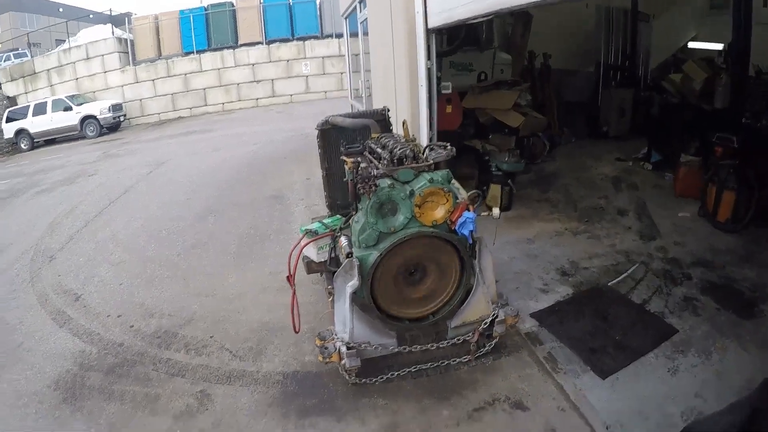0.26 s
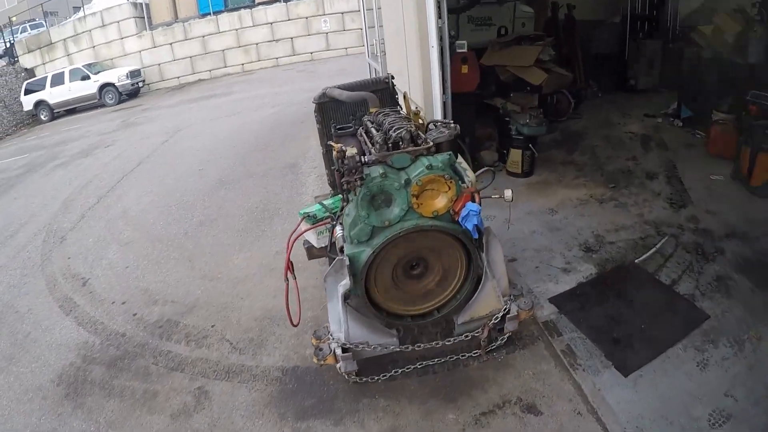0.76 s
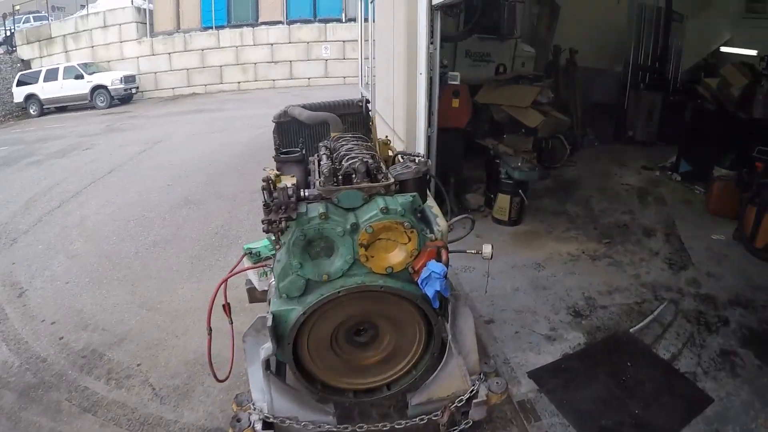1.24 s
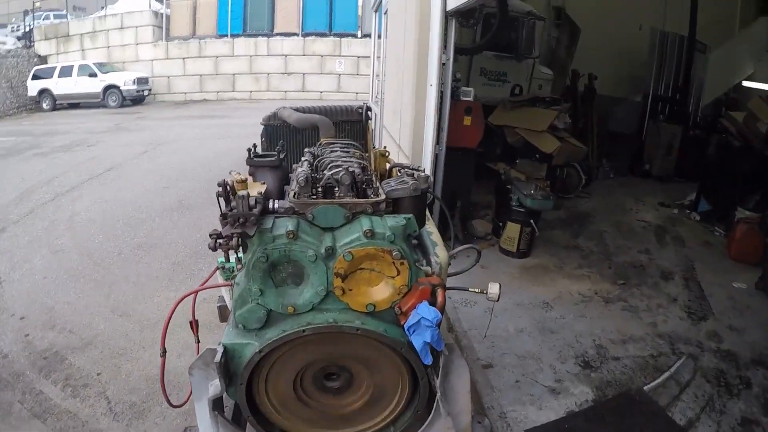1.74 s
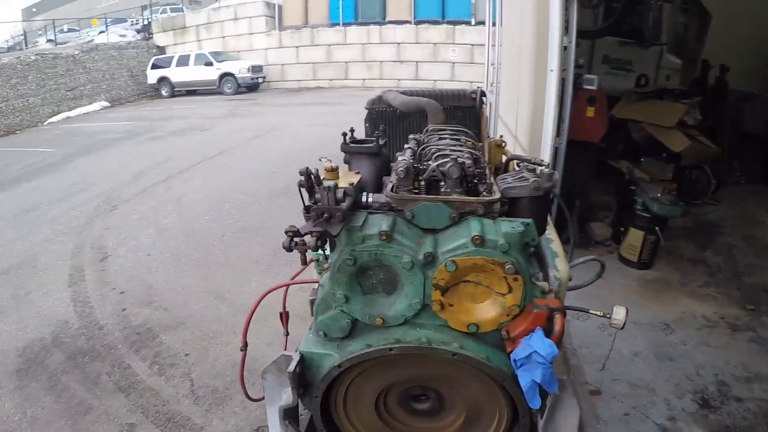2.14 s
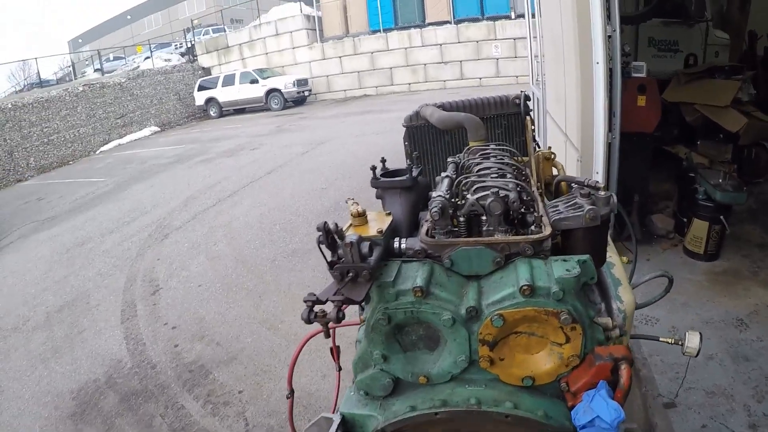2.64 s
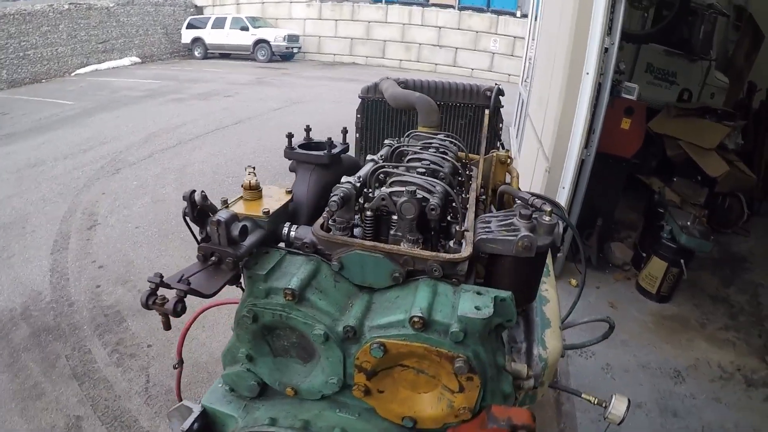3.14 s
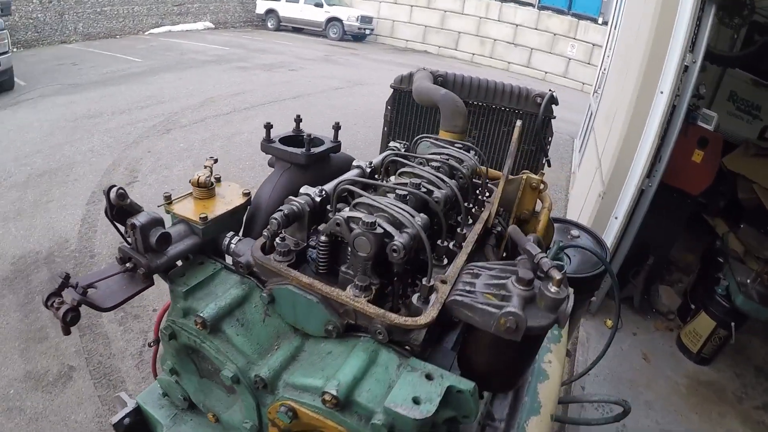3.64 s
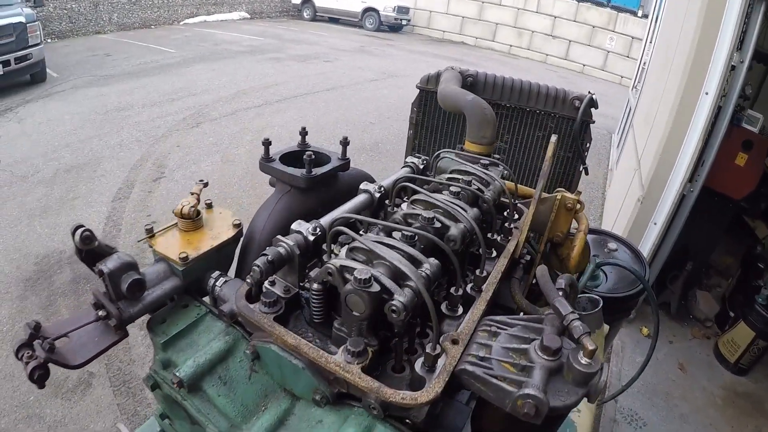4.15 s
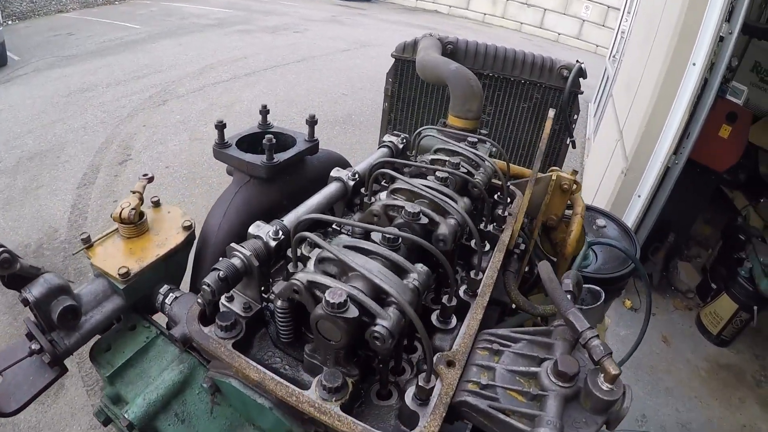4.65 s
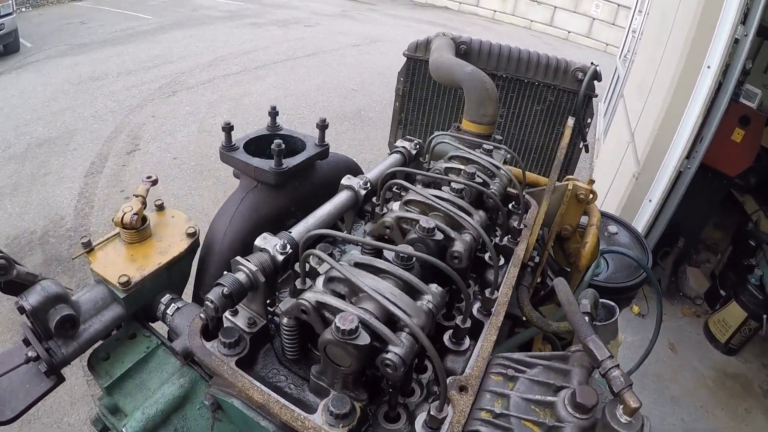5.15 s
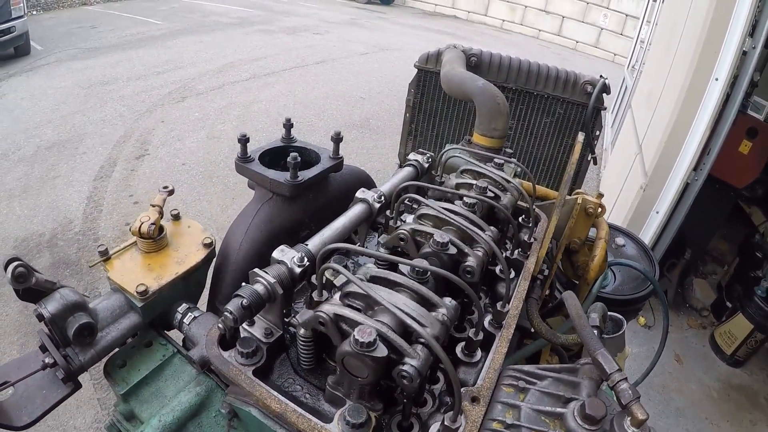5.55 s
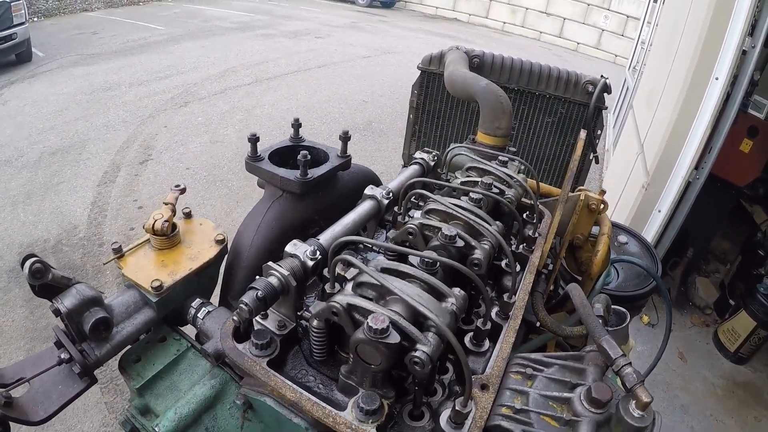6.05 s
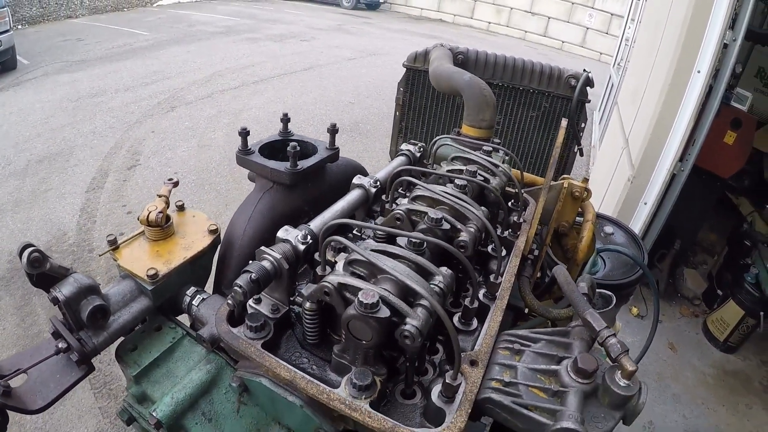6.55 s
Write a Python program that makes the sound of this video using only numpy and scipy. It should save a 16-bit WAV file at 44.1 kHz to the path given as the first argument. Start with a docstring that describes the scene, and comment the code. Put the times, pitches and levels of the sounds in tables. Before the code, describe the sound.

Fast, uneven diesel chugging over blower hiss, the hollow exhaust hum giving way to sharp rocker and valve rattle as one walks up close.

```python
"""A three-cylinder two-stroke diesel idles over the hiss of its blower and fan, both running from the start.
Each firing knocks the iron block (ringing modes), sets off metallic clatter (bursts of noise and thin modes)
and booms in the exhaust (resonances struck by pulses). The governor hunts, so firings run a few ms early or late.
The listener walks up to the bare valve gear, so the balance of the layers changes on the way.
"""
import sys
import numpy as np
from scipy import signal
from scipy.io import wavfile

SR = 44100
rng = np.random.default_rng(int(sys.argv[2]) if len(sys.argv) > 2 else 0)


def unload_audio(sound):
    """Save the sound as a 16-bit wav file, at the path given as the first command line argument."""
    columns = np.transpose(np.atleast_2d(sound))
    # keep every value between -1 and 1, then stretch to whole-number steps
    steps = np.round(np.clip(columns, -1, 1) * 32767)
    wavfile.write(sys.argv[1], SR, steps.astype(np.int16))


N = 299880

# firing rate, and the time of one firing of the first cylinder, before the governor shifts them
FIRING_HZ, CYLINDER_1_S = 30.475, .063
SLAP_MS = 12.3  # from the knock to the rocker slap


def undb(db):
    """Turn a level in dB into a gain."""
    return 10 ** (np.asarray(db) / 20)


def at(table, hz):
    """Read a table of (Hz, value) at any pitch, on a log-frequency axis."""
    table_hz, values = np.array(table)[:, 0], np.array(table)[:, 1]
    return np.interp(np.log(hz), np.log(table_hz), values)


def by_distance(near, levels_db):
    """Blend three levels in dB (far, halfway, near) by the nearness 0-1."""
    return np.interp(near, [0, .5, 1], levels_db)


def ring(x, hz, width):
    """Let x excite a two-pole resonance with gain 1 at its centre; a narrow width rings longer."""
    return signal.lfilter(*signal.iirpeak(hz, hz / width, SR), x)


def fade(x, ms):
    """Give each click a tail that dies away with this time constant, starting at the click's height."""
    return signal.lfilter([1], [1, -np.exp(-1000 / (ms * SR))], x)


def clicks(times, sizes):
    """Put a click at each time, shared between two samples to place it exactly."""
    place = np.clip(times * SR, 0, N)
    first = place.astype(int)
    late_share = place - first
    inside = sizes * (times > 0)
    out = np.zeros(N + 2)
    np.add.at(out, first, inside * (1 - late_share))
    np.add.at(out, first + 1, inside * late_share)
    return out[:N]


# How alike left and right are.
# Each row: frequency in Hz, likeness from 0 (unrelated) to 1 (identical).
LIKENESS = [(35, .3), (100, 0.45), (500, 0.94), (1000, 0), (2000, 0.81), (5000, 1), (7000, 0.56), (9000, 0),
            (14000, 0)]


def pair(hz, octaves):
    """Make a band of noise for left and right, rms 1, sharing a middle part and opposed in a side part."""
    edges = hz * 2 ** (np.array([-octaves, octaves]) / 2)
    edges = np.minimum(edges, .49 * SR)
    band = signal.butter(2, edges, "band", fs=SR, output="sos")
    mid, side = signal.sosfilt(band, rng.standard_normal((2, N)))
    alike = np.clip(at(LIKENESS, hz), 0, 1)
    opposed = np.array([[1], [-1]])
    both = np.sqrt(1 + alike) * mid + np.sqrt(1 - alike) * side * opposed
    return both / both.std()


# How the governor hunts. Each row: time in seconds, how late the firings run in ms (negative is early).
GOVERNOR = [(0, -3), (.4, 2), (.6, 2.8), (1.15, -1.5), (1.5, -1.2), (2.15, 1.9), (2.55, 1.8), (3.2, -1.9),
            (3.6, 1.2), (3.85, 1), (4.4, -6.6), (4.6, -6), (5, -2), (5.4, 4.5), (5.62, 5), (6.05, 1.6),
            (6.8, -.9)]
# The cylinders in firing order; the knock and the exhaust take only part of the lateness.
# Each row: lateness in ms, boom in dB, clatter in dB, rattle of the rocker slap in dB against that clatter.
CYLINDERS = [(0.03, 0, -2, -17), (0.63, 0, -4.5, -12.5), (0.02, -0.5, -2.5, -17.5)]


def firings():
    """Space the firings evenly, then let the governor shift them; also number the cylinder that fires."""
    cylinders = len(CYLINDERS)
    count = np.arange(int(N / SR * FIRING_HZ) + cylinders)
    even = CYLINDER_1_S + (count - cylinders) / FIRING_HZ  # counting starts one round earlier
    late_ms = np.interp(even, *np.transpose(GOVERNOR))
    return even + late_ms / 1000, count % cylinders


# Colour of the blower and fan. Each row: frequency in Hz, level in dB per Hz (only the shape counts).
HISS_COLOUR = [(40, -14), (100, -4), (170, -17.5), (250, -0.5), (400, -10), (600, -11.5), (1000, -11.5),
               (1300, -18), (2000, -20), (4000, -25), (5200, -27.5), (7000, -19.5), (9000, -44.5),
               (15000, -42)]
HISS_DB = -26  # before the walk changes it


def blower():
    """Blower and radiator fan rush steadily: half-octave bands of noise, weighted by their colour."""
    out = 0
    for hz in 40 * 2 ** np.arange(0, 8.7, .5):
        db = at(HISS_COLOUR, hz) + 10 * np.log10(hz)  # a wider band holds more power
        out = out + pair(hz, .5) * undb(db)
    return out * undb(HISS_DB) / out.std()


# Ringing modes of the block and valve gear. Each row: frequency in Hz, width in Hz,
# level in dB when struck by cylinder 1, 2 and 3, change in dB when far, change in dB when near,
# extra level of the slap in dB.
BLOCK_MODES = [(346, 35, -39.5, -28.5, -39.5, -12, -1.5, -4), (399.4, 29, -38, -24, -43, -13.5, -9, 2),
               (439.8, 28, -41.5, -45, -28, 6, -10, 3), (504.3, 77, -33, -36, -28, -18.5, 5.5, -11.5),
               (594, 45, -29.5, -42, -30.5, -10.5, 6.5, -1), (693.6, 33.5, -36.5, -33.5, -40, -8, 8, 4),
               (759, 42, -41.5, -33, -37.5, -8, -6, 1), (952, 21.3, -28, -35, -41, -7.5, 6, -6),
               (1023, 120, -37, -49, -39.5, -5.5, 3, 0), (1257, 20.5, -57, -45, -34, -2.5, -10, 2.5),
               (1630, 100, -46, -48, -40, 0, 1, 3), (1894, 87, -47, -50, -43, -11, -1, -6),
               (2017, 55, -44.5, -47, -48, -5, 7.5, -1), (2636, 30, -39, -67, -49, -4, 4, -13),
               (3094, 29, -39, -40, -44, -6, -32, 6), (3390, 30, -67, -53, -64, 14, -50, -17),
               (4100, 55, -62, -48, -50.5, -4, -4, 3)]
# Force of the slap on the block against the knock. One value for each cylinder, in dB.
SLAP_FORCE = np.array([-14, -12, -3])
# Stereo lean of the knock and clatter. Each row: frequency in Hz, left minus right in dB.
LEFT_RIGHT = [(400, 4), (700, -2), (1300, -0.5), (2400, 3), (5000, -2.5), (7200, 2), (9000, -10),
              (14000, -3.5)]
KNOCK_LEAD_MS = 1.982  # the knock comes before the firing time


def knock(times, which, near):
    """The pressure jump, then a rocker slap, strike the block; each cylinder reaches the modes differently."""
    late_ms = np.array(CYLINDERS)[which, 0]
    slap_db = np.array(SLAP_FORCE)[which]
    chance = rng.standard_normal((len(times), len(BLOCK_MODES), 4)).T
    out = 0
    for k, (hz, width, *reach_db, far_db, near_db, mode_slap_db) in enumerate(BLOCK_MODES):
        size = SR / (2 * FIRING_HZ) * undb(np.array(reach_db)[which])
        when = times + (.5 * late_ms - KNOCK_LEAD_MS + 0.085 * chance[0, k]) / 1000
        slap_when = when + (SLAP_MS + .15 * chance[1, k]) / 1000
        knock_size = size * undb(1.23 * chance[2, k])
        slap_size = size * undb(slap_db + mode_slap_db + 2.0 * chance[3, k])
        blows = clicks(when, knock_size) + clicks(slap_when, slap_size)
        # a broad resonance first stands for the length of the contact
        softened = ring(blows, hz, hz / 2)
        struck = ring(softened, hz, width) * undb(by_distance(near, [far_db, 0, near_db]))
        # left and right hear each mode from its own side, up to 3 samples apart
        lean = at(LEFT_RIGHT, hz) / 2
        left = struck * undb(lean)
        right = np.roll(struck, rng.integers(-3, 4)) * undb(-lean)
        out = out + np.array([left, right])
    return out


# Colour of the clatter from afar. Each row: frequency in Hz, level in dB per Hz (only the shape counts).
COLOUR_FAR = [(710, -33), (1200, -4.5), (1610, -4), (2240, -7.5), (3030, -6.5), (4100, -1), (5030, -16.5),
              (6870, 2.5), (12400, -15.5), (14800, -13), (15800, -36)]
# Colour of the clatter close up. Each row: frequency in Hz, level in dB per Hz.
COLOUR_NEAR = [(710, -44), (1200, -19.5), (1590, -6), (1750, -12), (2610, -9.5), (2930, -8), (5310, -8),
               (7170, 2.5), (8620, -16), (10500, -15.5), (15800, -37)]
# How long a burst lasts. Each row: frequency in Hz, time in ms for its tail to fall by 60 dB.
CLATTER_TAIL = [(2000, 63), (7000, 37.2), (14000, 39)]
CLATTER_DB = -26  # before the walk changes it


def clatter(times, which, near, rise_ms=1.78, scatter_db=0.45, colour_db=2.5, grit_db=2.0,
            ring_db=0.0, sharpness=71.0, blow_ms=2.4):
    """Injector, valves and piston rattle in a burst at each firing and at the slap, each with its own colour."""
    late_ms, _, cylinder_db, slap_db = np.array(CYLINDERS)[which].T
    chance = rng.standard_normal((len(times), 3)).T
    when = times + (late_ms - 1.0 + 0.23 * chance[0]) / 1000
    slap_when = when + (SLAP_MS - 1.5 + 1.2 * chance[1]) / 1000
    # single impacts make it gritty: a new random level every 40 samples
    steps = np.repeat(rng.standard_normal(N // 40 + 1), 40)[:N]
    grit = undb(grit_db * steps)
    out = 0
    for hz in 1300 * 2 ** np.arange(0, 3.6, .2):
        own_colour = colour_db * rng.standard_normal((len(times), 2)).T
        firing_db, at_slap_db = own_colour + cylinder_db + scatter_db * chance[2]
        hits = clicks(when, undb(firing_db)) + clicks(slap_when, undb(slap_db + at_slap_db))
        tail_ms = at(CLATTER_TAIL, hz) / np.log(1000)  # 60 dB is a factor of 1000
        burst = fade(fade(hits, tail_ms), rise_ms) * grit
        noise = pair(hz, 0.23)
        # springs, rockers and covers add many thin modes, rung by the first few ms of the burst
        blow = noise * fade(fade(hits, blow_ms), rise_ms) * grit
        thin_hz = hz * 2 ** rng.uniform(-0.105, 0.112, size=5)
        thin = sum(ring(blow, f, f / sharpness) for f in thin_hz)
        band = noise * burst / burst.std() + undb(ring_db) * thin / thin.std()
        far_db, near_db = at(COLOUR_FAR, hz), at(COLOUR_NEAR, hz)
        db = far_db + near * (near_db - far_db) + 10 * np.log10(hz)
        lean = at(LEFT_RIGHT, hz) / 2
        out = out + band * undb(db + np.array([[lean], [-lean]]))
    return out * undb(CLATTER_DB) / out.std()


# Exhaust resonances that boom. Each row: frequency in Hz, width in Hz, arrival in ms after the firing,
# polarity (1 or -1), level in dB when far, halfway and near.
BOOM_MODES = [(54.3, 6.7, 11.5, -1, -23, -28.5, -32.5), (133.5, 23.8, 0.2, 1, -25, -18, -13),
              (89, 31.5, 7.96, 1, -31, -32.5, -23.5), (169.5, 38, 7.73, 1, -26, -22, -18.5),
              (207, 92, 7.68, 1, -24, -27, -67)]
# Exhaust resonances of the pipe that rings on. Each row: the same columns as the boom.
PIPE_MODES = [(247, 7.5, 7.47, -1, -4, -11.5, -16), (262.7, 12.7, 12.57, 1, -9.5, -21, -19)]
PULSE_HZ = 340  # treble limit of the exhaust pulse


def exhaust(times, which, near, boom_db, pipe_db):
    """Blow-down pulses boom at once and again on their way back along the pipe, which rings on."""
    late_ms, cylinder_db = np.array(CYLINDERS)[which, :2].T
    chance = rng.standard_normal((len(times), 2)).T
    size = SR / (2 * FIRING_HZ) * undb(cylinder_db + 0.13 * chance[0])
    when = times + (0.59 * late_ms + 0.12 * chance[1]) / 1000
    out = 0
    for modes, db in ((BOOM_MODES, boom_db), (PIPE_MODES, pipe_db)):
        for hz, width, ms, sign, *place_db in modes:
            gain = undb(db + by_distance(near, place_db))
            pulses = clicks(when + ms / 1000, size)
            out = out + np.sign(sign) * ring(pulses, hz, width) * gain
    # a puff of gas lasts a ms or two, so it has no treble
    soft = signal.butter(6, PULSE_HZ, fs=SR, output="sos")
    return signal.sosfiltfilt(soft, out)


# The walk up to the engine. Each row: time in seconds, nearness from 0 to 1, level of the pipe ring in dB.
WALK = [(0, 0.14, 1), (.6, 0.21, 2.5), (1.1, .25, -2), (2.1, 0.46, -0.5), (2.7, 0.41, -1), (3.6, 0.76, 0.5),
        (4.6, 0.85, 2), (5.1, 0.84, 5), (6.0, 0.87, 1), (6.8, .9, 2)]
# Level of the exhaust boom on the walk: far in dB, halfway in dB, near in dB.
BOOM_LEVEL = (2, 1.74, -1.26)
# Level of the knock on the walk: far in dB, halfway in dB, near in dB.
KNOCK_LEVEL = (1.5, 0.55, -6.5)
# Change in the clatter on the walk: far in dB, halfway in dB, near in dB.
CLATTER_LEVEL = (-2, 2, 3.2)


def scene():
    """Mix the engine as heard by the walking listener; the exhaust pipe stands to the left."""
    seconds, *columns = np.transpose(WALK)
    clock = np.arange(N) / SR
    near, pipe_db = (np.interp(clock, seconds, c) for c in columns)
    times, which = firings()
    hiss = blower() * undb(-4.5 * near)
    block = knock(times, which, near) * undb(by_distance(near, KNOCK_LEVEL))
    rattle = clatter(times, which, near) * undb(by_distance(near, CLATTER_LEVEL))
    lean = 1.2 + .7 * near  # dB up on the left, down on the right
    boom = exhaust(times, which, near, by_distance(near, BOOM_LEVEL), pipe_db)
    boom = boom * undb(np.array([lean, -lean]))
    return hiss + block + rattle + boom


TOP_HZ = 15450  # treble above this is cut


def record(dry):
    """Round off the loudest peaks, then cut the highest treble steeply."""
    rounded = dry / (1 + np.abs(dry) ** 6) ** (1 / 6)
    return signal.sosfilt(signal.ellip(8, .2, 70, TOP_HZ, fs=SR, output="sos"), rounded)


dry = scene()
out = record(dry)
unload_audio(out)
```